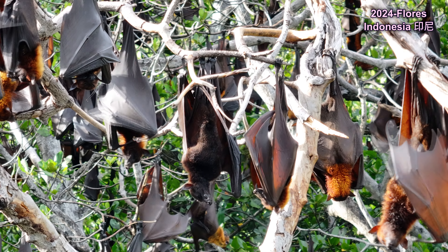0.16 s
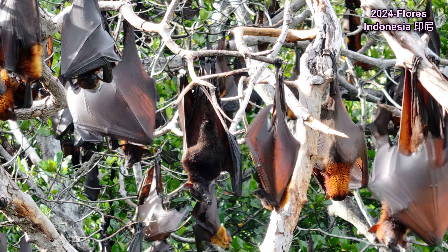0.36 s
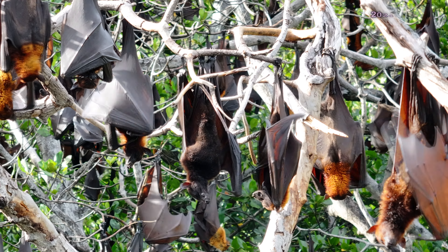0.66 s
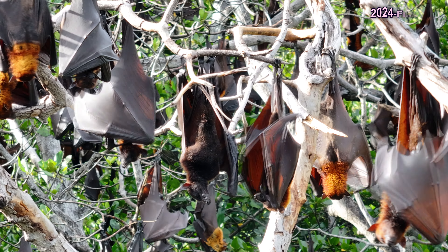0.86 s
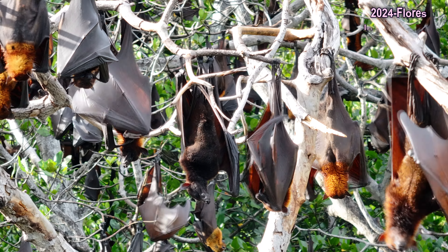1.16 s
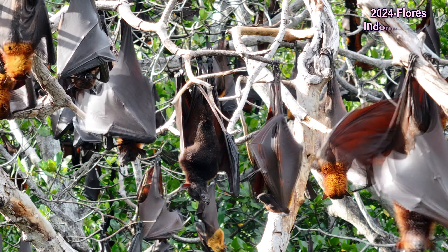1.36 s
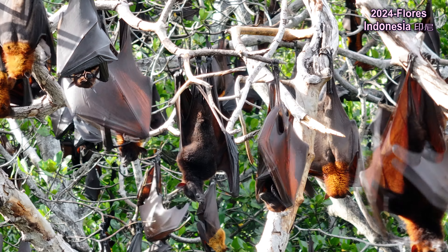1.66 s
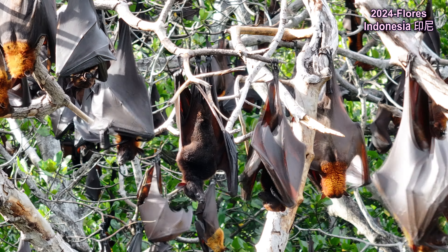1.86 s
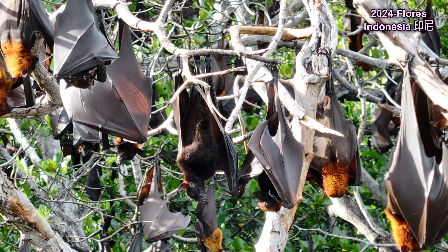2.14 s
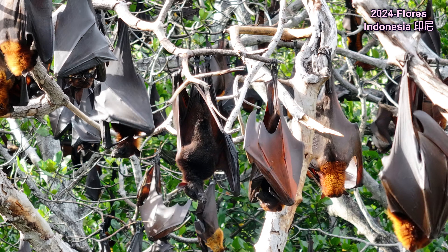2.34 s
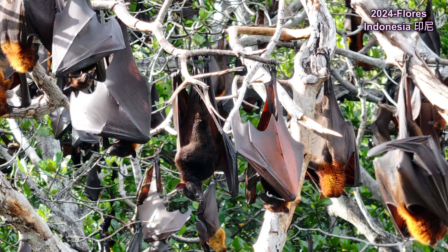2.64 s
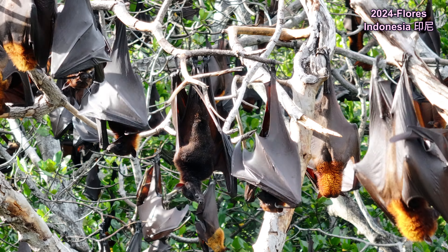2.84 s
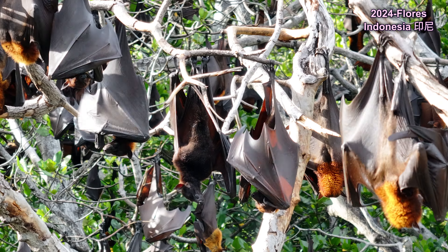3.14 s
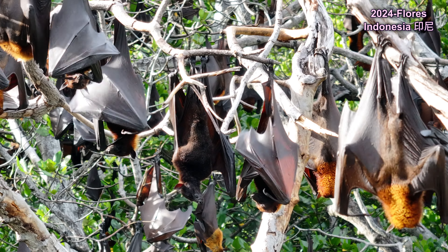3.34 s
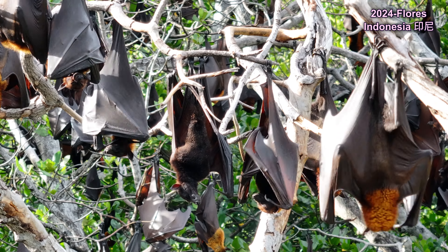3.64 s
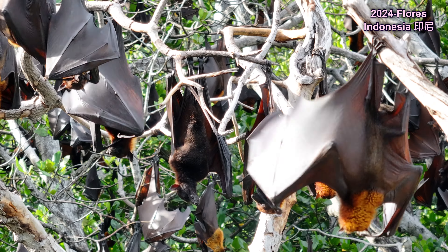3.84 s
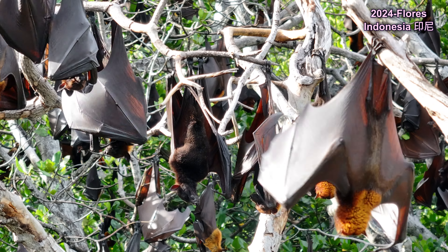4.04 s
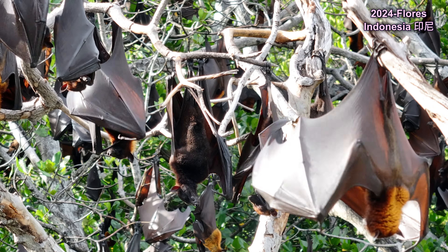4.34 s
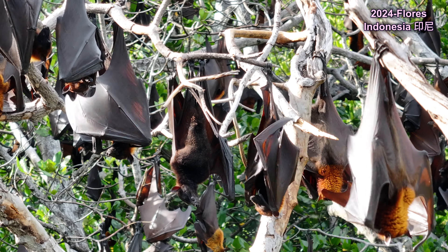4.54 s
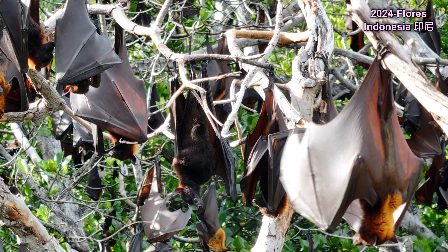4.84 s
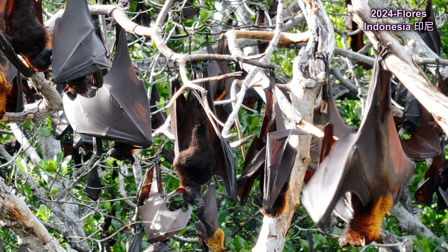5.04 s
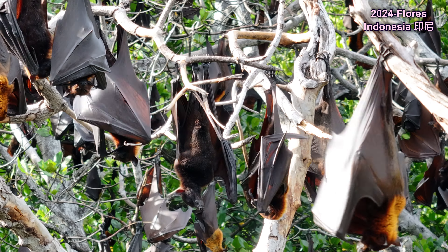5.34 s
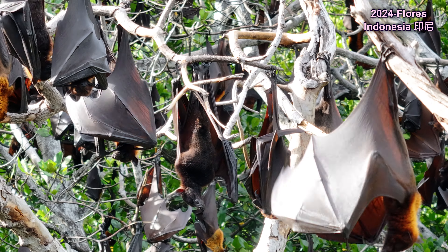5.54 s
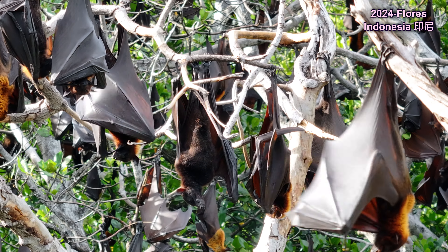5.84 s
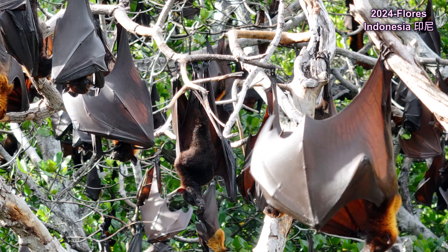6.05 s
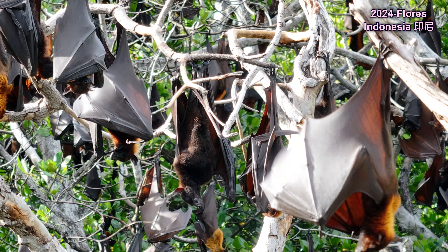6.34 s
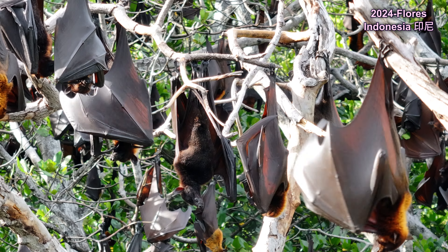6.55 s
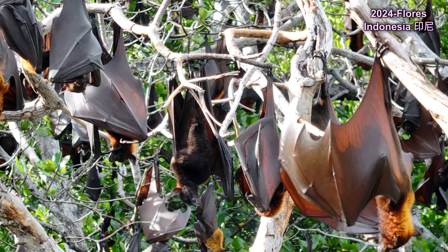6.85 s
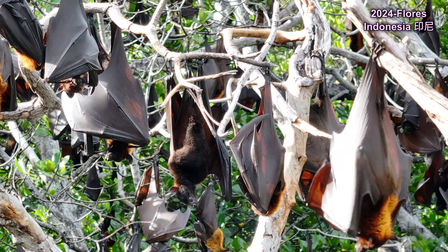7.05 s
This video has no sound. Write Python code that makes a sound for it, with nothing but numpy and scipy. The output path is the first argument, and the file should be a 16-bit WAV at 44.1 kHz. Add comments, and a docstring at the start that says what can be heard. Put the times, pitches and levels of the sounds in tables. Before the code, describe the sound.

A noisy fruit bat colony heard through one outdoor microphone, the same in both channels. Shrill massed squealing swells and ebbs under overlapping raspy screeches, brief squeaks and faint grunts. Early soft, heavy wing flaps and rumbling air give way to scattered creaky rattles close by, which grow into a continuous throbbing chatter, snapping and yapping over the crowd. Leaves and trunks add a short scattered tail.

```python
"""A shrill chorus and the dull clap of a wing open this roost of large fruit bats in the trees.
The chorus is hundreds of far squeals from noisy vocal folds; nearer bats whistle and screech over it
through throat resonances, with faint grunts below; a bat close by gives short rattles before and during
a long chatter, all made of snaps that ring its throat. Wing beats and gusts are coloured noise.
One microphone hears it all, and a limiter holds the peaks down."""
import sys
import numpy as np
from scipy import signal
from scipy.fft import rfft, irfft, next_fast_len
from scipy.io import wavfile
from scipy.ndimage import uniform_filter1d, minimum_filter1d

SR = 44100
rng = np.random.default_rng(int(sys.argv[2]) if len(sys.argv) > 2 else 0)


def to_wav(s):
    """Save 16-bit WAV."""
    ch = np.atleast_2d(s).T  # columns
    pcm = np.round(np.clip(ch, -1, 1) * 32767)  # PCM
    wavfile.write(sys.argv[1], SR, pcm.astype(np.int16))


N = 317520
TIME = np.arange(N) / SR


def amp(db):
    """Decibels to gain."""
    return 10 ** (np.asarray(db) / 20)


def unit(x):
    """Scales to rms 1."""
    return x / np.sqrt(np.mean(x ** 2) + 1e-20)


def samples(start, end):
    """Length of a call in samples, at least 10 ms."""
    return max(int((end - start) * SR), SR // 100)


def add(mix, s, sound):
    """Mixes a sound in at a time in seconds."""
    part = mix[max(round(s * SR), 0):][:len(sound)]
    part += sound[:len(part)]


def shape(x, gain):
    """Filters by a gain given as a function of frequency in Hz; rms 1."""
    size = next_fast_len(len(x))
    spectrum = rfft(x, size) * gain(np.fft.rfftfreq(size, 1 / SR))
    return unit(irfft(spectrum, size)[:len(x)])


def colour(x, points):
    """Filters by a curve of (Hz, dB) points, joined along log frequency; rms 1."""
    hz, db = np.transpose(points)
    return shape(x, lambda f: amp(np.interp(np.log(f + 1), np.log(hz), db)))


def waver(size, hz):
    """Random motion up to a rate: noise with its faster part filtered away."""
    noise = rng.standard_normal(size + 2048)
    return shape(noise, lambda f: 1 / (1 + (f / hz) ** 4))[:size]


def resonate(x, hz, width):
    """A steep resonance of gain 1 that can follow a curve: shift down to 0 Hz, smooth, shift back."""
    turn = np.exp(2j * np.pi * np.cumsum(hz * np.ones(len(x))) / SR)
    r = np.exp(-np.pi * abs(width) / SR)
    smooth = signal.lfilter([(1 - r) ** 2], [1, -2 * r, r * r], x / turn + 1e-18)
    return 2 * (turn * smooth).real


def folds(size, hz, arch, rough, jitter=0.0683, jitter_hz=450, wobble=0.01161, rasp_db=2.5, rasp_hz=130):
    """Strained vocal folds: an arching pitch whose cycles grow uneven and noisy with roughness."""
    rough = np.clip(rough, 0, 1)
    bend = arch * (np.sin(np.linspace(0, np.pi, size)) - 2 / np.pi) + wobble * waver(size, hz=33.4)
    uneven = jitter * rough * waver(size, jitter_hz)
    phase = 2 * np.pi * np.cumsum(hz * (1 + bend + uneven)) / SR
    # equal harmonics up to about half the sample rate make one sharp pulse a cycle
    top = int(SR / 2 / (hz * (1 + abs(arch))))
    pulses = unit(np.sin((top + .5) * phase) / (np.sin(phase / 2) + 1e-12) - 1)
    puffs = unit((1 + np.cos(phase)) * rng.standard_normal(size))
    voice = np.sqrt(1 - rough ** 2) * pulses + rough * puffs
    return voice * amp(rasp_db * waver(size, rasp_hz))


def canopy(x, t60, wet_db):
    """Trunks and leaves scatter the sound into a short tail of sparse echoes."""
    t = np.arange(SR // 2) / SR
    sparse = rng.random(len(t)) < 2500 / SR  # about 2500 echoes a second
    taps = rng.standard_normal(len(t)) * sparse * (t > .004) * amp(-60 * t / t60)
    tail = signal.fftconvolve(x, taps / np.linalg.norm(taps))[:N]
    return (x + amp(wet_db) * tail) / np.sqrt(1 + amp(wet_db) ** 2)


# The low outdoor background, as a filter curve. Each row: frequency in Hz, relative gain in dB.
BACKGROUND_COLOUR = [(25, -12), (60, -5.5), (130, -4.5), (250, 1), (340, -3), (550, 0.5), (800, -3.5),
                     (1250, -3.5), (2000, -7.5), (5000, -38)]


def background():
    """The low outdoor sound around the trees: coloured noise that drifts slowly in level."""
    noise = amp(-37) * colour(rng.standard_normal(N), BACKGROUND_COLOUR)
    return noise * amp(.9 * waver(N, hz=2.5))


# The far colony swells and ebbs at the microphone. Each row: time in seconds, relative level in dB.
CHORUS_SWELL = [(0, -20.5), (.24, -20.5), (.4, -19), (1.0, -18.5), (1.5, -16), (2.1, -16), (2.6, -18),
                (2.84, -16.5), (2.96, -19), (3.05, -17), (3.6, -16), (4.15, -17), (4.45, -22.5), (4.9, -16),
                (5.4, -18.5), (5.75, -22), (6.7, -21.5), (7.2, -19.5)]
# Its tone from afar, as a filter curve. Each row: frequency in Hz, relative gain in dB.
CHORUS_COLOUR = [(700, -27), (1200, -9.5), (1550, -6.5), (1900, 1), (2600, 2.5), (3300, 1), (4100, -2),
                 (5100, -1.5), (6100, -9), (8000, -10), (9400, -18), (10500, -23), (13000, -26),
                 (15700, -34)]


def colony(count=640, level_db=-1, spread_db=4.5, least_rough=0.303):
    """Far bats squeal in turn, each with its own pitch, length and level; their sum swells and ebbs."""
    out = np.zeros(N + SR)
    # the squeals start half a second early, so the chorus is already full at the opening
    for turn, (when, length, pitch, arch, rough, near) in enumerate(rng.random((count, 6))):
        size = int(SR * (.035 + .13 * length))
        call = folds(size, 900 * 3 ** pitch, .3 * (arch - .3), least_rough + .5 * rough)
        call = call * np.hanning(size)
        add(out, (turn + when) / count * (N / SR + .5), call * amp(2 * spread_db * near))
    scattered = canopy(out[SR // 2:][:N], t60=.45, wet_db=-4)
    crowd = colour(scattered, CHORUS_COLOUR)
    # even out the chance swells before the swell of the table
    crowd = crowd / np.sqrt(uniform_filter1d(crowd ** 2, size=SR // 6))
    return amp(level_db + np.interp(TIME, *np.transpose(CHORUS_SWELL))) * crowd


# Thin whistles and squeaks over the chorus. Each row: start in seconds, end in seconds, level in dB,
# pitch at the start in Hz, pitch at the end in Hz, arch of the pitch as a share.
WHISTLES = [(0.0, 0.132, -33.5, 9100, 9100, .045), (0.311, 0.386, -24, 1920, 2200, -0.051),
            (.32, 0.436, -35, 9450, 9500, -0.034), (.43, .553, -29.5, 9550, 8600, -0.017),
            (1.385, 1.45, -18.5, 3390, 3480, 0.12), (1.792, 1.895, -32, 5060, 5140, 0),
            (1.899, 1.997, -24, 2980, 2880, 0), (2.223, 2.331, -25, 2750, 2390, 0),
            (6.612, 6.644, -22, 4700, 4420, -0.014), (6.66, 6.69, -25, 4600, 4450, -0.0054),
            (6.974, 7.011, -22, 4340, 4370, 0.0097), (7.058, 7.232, -22.5, 4126, 4290, 0.001)]


def whistles(wobble=0.0122, octave_db=-13):
    """Nearly pure gliding squeaks: a wavering sine and its weaker octave."""
    out = np.zeros(N)
    for start, end, db, from_hz, to_hz, arch in WHISTLES:
        size = samples(start, end)
        bend = arch * np.sin(np.linspace(0, np.pi, size)) + wobble * waver(size, hz=120)
        phase = 2 * np.pi * np.cumsum(np.linspace(from_hz, to_hz, size) * (1 + bend)) / SR
        tone = unit(np.sin(phase) + amp(octave_db) * np.sin(2 * phase))
        add(out, start, amp(db) * tone * signal.windows.tukey(size, .5))
    return canopy(out, t60=0.3, wet_db=-34)


# Wing beats. Each row: start in seconds, level in dB, time to fall by 60 dB in seconds.
BEATS = [(0.0, -13.5, 0.17), (.382, -10, 0.17), (.773, -10, 0.18), (2.809, -19, 0.065), (4.015, -28, 0.082)]
# The dull tone of a beat, as a filter curve. Each row: frequency in Hz, relative gain in dB.
BEAT_COLOUR = [(30, -16), (90, -4), (200, 4.5), (450, 0), (700, -4.5), (1100, -6.5), (1800, -26),
               (5000, -53)]


def wing_beats():
    """Each beat is a dull clap of membrane: coloured noise with a fast rise and a steady decay."""
    out, t = np.zeros(N), np.arange(SR // 4) / SR
    for s, db, t60 in BEATS:
        clap = colour(rng.standard_normal(len(t)), BEAT_COLOUR)
        add(out, s, amp(db - 60 * t / t60) * clap * (1 - np.exp(-t / 0.00098)))
    return out


# Nearer screeches. Each row: start in seconds, end in seconds, relative level in dB, pitch in Hz,
# roughness (0 to 1; beyond 1 only the resonances widen), lower resonance in Hz, upper resonance in Hz,
# level of the upper against the lower in dB, level of the shrill top in dB.
SCREECHES = [ (0.058, 0.15, -23, 1000, 0.47, 2000, 6050, 11, -6),
             (.118, 0.184, -12, 1260, 0.61, 3000, 3480, -1, -40),
             (0.177, 0.302, -20.5, 1194, 0.7, 2760, 3630, 20, -30),
             (.285, 0.396, -16.5, 1085, 0.91, 2330, 6170, -4, -20),
             (0.413, 0.824, -15, 1309, 0.81, 2800, 5080, -4.5, -29),
             (0.482, .79, -17, 1430, 0.99, 4410, 7200, -6.5, -30),
             (0.704, 0.852, -19, 1226, .4, 2480, 4800, 11, -30),
             (.885, 1.138, -18.5, 1154, 1.17, 2040, 6250, -3, -28),
             (0.897, .95, -16.5, 1167, 0.68, 2070, 4760, -4, -11),
             (1.274, 1.48, -18.5, 1155, 0.5, 2230, 4600, -25, -40),
             (1.433, 1.83, -16, 1216, 0.9, 1950, 3320, 0.5, -25),
             (1.606, 1.765, -18.5, 1156, .3, 2240, 3750, -5, -35),
             (1.91, 2.05, -17, 1484, 0.84, 1900, 3230, 8, -14),
             (1.918, 2.34, -33, 1334, 0.5, 9500, 12600, 0, -20),
             (1.974, 2.218, -16.5, 1625, .8, 3370, 5200, -10, -24),
             (2.164, 2.355, -18, 1362, 0.65, 2720, 5630, -4, -13),
             (2.424, 2.80, -21.5, 1266, 0.54, 1920, 2870, -4, -33),
             (3.142, 3.22, -19, 1100, 0.67, 2240, 5630, -4, -32),
             (3.749, 4.13, -19.5, 1665, 0.72, 3470, 4970, -5, -10.5),
             (3.983, 4.33, -19, 1740, 0.79, 5040, 6900, 5, -7),
             (4.268, 4.66, -22, 1358, 0.66, 5300, 7100, 0.5, -7),
             (4.325, 4.51, -25, 1525, 0.77, 9000, 12200, 5, -10),
             (4.931, 5.213, -15.5, 1473, 0.64, 5670, 7340, 9, -11),
             (5.162, 5.301, -17, 948, .65, 2930, 9000, -8, -8),
             (5.276, 5.643, -25, 1100, 0.86, 2960, 8600, -5, -12),
             (6.771, 6.98, -20, 1413, 0.8, 2590, 5550, 0.5, -24),
             (6.954, 7.254, -19, 1348, 0.72, 2670, 5540, 5, -12)]
# Top resonances that all screeches share. Each row: frequency in Hz, width in Hz, relative level in dB.
SHRILL_TOP = [(9140, 1630, 10), (11900, 5700, -2)]
# a resonance widens with roughness and frequency: at roughness 1 it is WIDTH_HZ wide at WIDTH_AT_HZ
WIDTH_HZ, WIDTH_AT_HZ, WIDTH_POWER = 1630, 2900, 0.96
# in every screech the pitch and the opening mouth arch up and down by these shares
ARCH, MOUTH_ARCH = .045, 0.11


def branches(x, count=6, echo_db=-11, longest_s=.004):
    """A few echoes from the nearest branches comb a voice with uneven fixed stripes."""
    delays = rng.random(count) * longest_s + 0.000884
    signs = rng.choice([-1, 1], count)
    return shape(x, lambda f: abs(1 + amp(echo_db) * np.exp(-2j * np.pi * np.outer(f, delays)) @ signs))


def screeches(level_db=-1, rise=0.13, fall=0.37, skirt_db=-15, flutter_db=2, flutter_hz=60):
    """Nearer bats force a rough, fluttering voice through two throat resonances and a shrill top."""
    out = np.zeros(N)
    for start, end, db, hz, rough, low_hz, high_hz, high_db, shrill_db in SCREECHES:
        size = samples(start, end)
        drive = branches(folds(size, hz, ARCH, rough))
        u = np.linspace(0, 1, size)
        mouth = 1 + MOUTH_ARCH * (np.sin(np.pi * u) - 2 / np.pi)

        def throat(f):
            """One throat resonance that moves with the mouth."""
            width = rough * WIDTH_HZ * (f / WIDTH_AT_HZ) ** WIDTH_POWER
            return unit(resonate(drive, f * mouth, width))

        throats = unit(throat(low_hz) + amp(high_db) * throat(high_hz))
        shrill = unit(sum(amp(top_db) * resonate(drive, f, width) for f, width, top_db in SHRILL_TOP))
        skirt = amp(skirt_db) * colour(drive, CHORUS_COLOUR)  # broad sound around the resonances
        voice = unit(throats + amp(shrill_db) * shrill) + skirt
        voice = shape(voice, lambda f: 1 / (1 + (1450 / (f + 1)) ** 6))  # a small mouth radiates little bass
        # swells in, holds, dies away
        effort = np.sin(np.pi / 2 * np.clip(np.minimum(u / rise, (1 - u) / fall), 0, 1))
        flutter = flutter_db * waver(size, flutter_hz)
        add(out, start, amp(db + level_db + flutter) * voice * effort)
    return canopy(out, t60=0.96, wet_db=-2.5)


# Weak lower partials and low grunts of the quarrel. Each row: start in seconds, end in seconds,
# level in dB, pitch in Hz, roughness from 0 to 1.
GRUNTS = [(0.32, 0.377, -25, 985, 0.3), (0.422, 0.757, -35, 1340, 0.24), (1.818, 2.008, -29.5, 445.4, 0.77),
          (2.224, 2.746, -39.5, 1350, 0.13), (2.622, 2.802, -34, 900, 0.5),
          (4.646, 5.285, -33, 279.8, 0.74), (5.297, 6.394, -49, 273.5, 0.76)]


def grunts(level_db=0, far_db=-43, count=70):
    """Faint low calls of the folds, a few near and many far, under the shrill voices."""
    out, far = np.zeros(N), np.zeros(N)
    for start, end, db, hz, rough in GRUNTS:
        size = samples(start, end)
        call = colour(folds(size, hz, arch=0.0668, rough=rough), BACKGROUND_COLOUR)
        add(out, start, amp(db + level_db) * call * signal.windows.tukey(size, .5))
    for when, length, pitch, arch in rng.random((count, 4)):
        size = int(SR * (.1 + .25 * length))
        call = folds(size, 220 * 3 ** pitch, .2 * (arch - .5), rough=.2)
        add(far, when * N / SR, call * np.hanning(size))
    return canopy(out + amp(far_db) * colour(far, BACKGROUND_COLOUR), t60=0.3, wet_db=-1.0)


# Gusts of air on the microphone. Each row: time of the peak in seconds, length in seconds, level in dB.
BUFFETS = [(0.55, 0.24, -30), (0.918, 0.086, -22), (1.044, 0.27, -17.5), (1.34, 0.25, -35),
           (2.519, 0.28, -23.5)]
# Their rumble, as a filter curve. Each row: frequency in Hz, relative gain in dB.
BUFFET_COLOUR = [(15, -18), (30, -4), (52, 0), (100, -2), (170, -8), (300, -15.5), (600, -26), (2000, -54)]


def buffets():
    """Air buffets the microphone: each gust swells and dies as a rumble of low noise."""
    gusts = np.zeros(N)
    for s, length, db in BUFFETS:
        gusts += amp(db) * np.cos(np.pi * np.clip((TIME - s) / length, -.5, .5)) ** 2
    return gusts * colour(rng.standard_normal(N), BUFFET_COLOUR)


# Throat of the bat close by. Each row: multiple of the mouth resonance, width in Hz, relative level in dB.
THROAT = [(1, 420, 8.5), (2.48, 786, -1.5), (3.6, 1520, -8), (4.8, 1800, -54)]


def creak(mouth_hz, per_s, snap_db, uneven_db, puff_s=0.0054, drift=0.033, ring_db=0):
    """Uneven snaps of the folds, at a given rate, each with a puff of air, ring the throat."""
    size = len(mouth_hz)
    turns = np.cumsum(per_s * np.exp(.3 * waver(size, hz=71.45))) / SR + .9
    strength = amp(uneven_db * rng.standard_normal(N // 100))[turns.astype(int)]
    age = (turns % 1) / per_s  # about the seconds since the last snap
    gate = strength * np.exp(-age / puff_s)
    air = unit(gate * rng.standard_normal(size))
    mouth_hz = mouth_hz * (1 + drift * waver(size, hz=59.85))
    ring = gate * np.cos(2 * np.pi * np.cumsum(mouth_hz) / SR)
    voice = unit(sum(amp(db) * resonate(air, k * mouth_hz, width) for k, width, db in THROAT))
    voice = unit(voice + amp(ring_db) * unit(resonate(ring, mouth_hz, width=950)))
    # the edge of each snap is a short bright tick
    edge = strength * np.exp(-age / .0012) * rng.standard_normal(size)
    tick_colour = [(1500, -41), (4800, -5.5), (6000, 0.5), (9500, -4.0), (12000, -10.0), (16000, -20.0)]
    return voice + amp(snap_db - 2.0) * colour(edge, tick_colour)


# Short rattling calls close by. Each row: start in seconds, end in seconds, relative level in dB,
# mouth resonance in Hz, relative level of the snaps in dB.
RATTLES = [(1.793, 1.832, -18.5, 2020, -4), (1.924, 1.972, -22.5, 1900, -2), (2.029, 2.047, -16, 1880, -16),
           (2.12, 2.163, -20.5, 1900, -18), (2.808, 2.84, -17, 1980, -9), (2.857, 2.915, -22, 2200, -25),
           (3.047, 3.10, -14.5, 2040, -8), (3.402, 3.508, -15, 2240, -12), (3.57, 3.603, -14, 2217, -22),
           (3.619, 3.675, -11.5, 2280, -14), (4.276, 4.372, -13.5, 2290, -22),
           (4.501, 4.576, -13, 2270, -10), (4.829, 4.885, -14.5, 2256, -8.5),
           (5.537, 5.62, -15.5, 2070, -6), (6.245, 6.385, -17.5, 1942, -6), (6.481, 6.698, -18, 2150, -4.5)]


def rattles(level_db=-1, snaps_per_s=95):
    """Short calls of the bat close by: a creak of about 95 snaps a second, heard as a rattle."""
    out = np.zeros(N)
    for start, end, db, hz, snap_db in RATTLES:
        size = samples(start, end)
        mouth_hz = np.full(size, hz)
        call = creak(mouth_hz, snaps_per_s, snap_db, uneven_db=1.5, puff_s=0.0045, drift=0.0288, ring_db=3.5)
        add(out, start, amp(db + level_db) * unit(call * signal.windows.tukey(size, .4)))
    return out


# Effort and mouth of the long chatter. Each row: time in seconds, relative level in dB,
# mouth resonance in Hz.
CHATTER = [(4.6, -19, 2060), (4.78, -14, 1920), (4.96, -24.5, 2020), (5.119, -13, 1951),
           (5.35, -16.5, 1957), (5.501, -13, 2000), (5.78, -14.5, 1970), (6.35, -14.5, 1980),
           (6.47, -15, 2042), (6.57, -13.5, 2000), (6.721, -15.5, 2103), (6.799, -13.5, 1994),
           (7.2, -12.5, 2085)]


def chatter(level_db=-2.6, throb_hz=26.4, throb_db=1.5):
    """One long quarrelling creak that throbs at an uneven syllable rate."""
    out = np.zeros(N)
    s, db, hz = np.transpose(CHATTER)
    t = np.arange(s[0], s[-1], 1 / SR)
    call = creak(np.interp(t, s, hz), per_s=150, snap_db=-11.5, uneven_db=1.9, drift=0.04513)
    throb = throb_db * waver(len(t), throb_hz)
    add(out, s[0], amp(np.interp(t, s, db) + level_db + throb) * call)
    return out


# The hardest yaps within the chatter. Each row: time in seconds (the yap begins 2 ms before),
# relative level in dB, mouth resonance in Hz.
YAPS = [(4.9501, -6.5, 2005), (5.2724, -10, 2020), (5.3338, -12, 1930), (5.4555, -4, 1970),
        (5.5498, -6, 1974), (5.688, -11, 2010), (5.8721, 2, 2015), (5.9429, -1, 2030), (6.0352, -6, 2150),
        (6.116, -6, 1856), (6.1441, -6, 2015), (6.1873, -13, 2020), (6.3749, -4, 2010), (6.5839, -10, 1915),
        (6.9845, -1, 2240), (7.1285, -10, 2135)]


def yaps(level_db=-7.5, length_s=.015):
    """Hard bursts of very fast creaking, each swelling and dying within a few milliseconds."""
    out = np.zeros(N)
    for s, db, hz in YAPS:
        size = int(length_s * SR)
        call = creak(np.full(size, hz), per_s=360, snap_db=-24, uneven_db=1.5)
        add(out, s - .002, amp(db + level_db) * unit(call * np.hanning(size)))
    return out


def near_bat():
    """The bat close by: short rattles before and during a long chatter with yaps, in a short canopy tail."""
    return canopy(rattles() + chatter() + yaps(), t60=0.14, wet_db=-3.5)


def scene():
    """All the bats over a low outdoor background, alike in both channels."""
    far = background() + colony()
    nearer = whistles() + screeches() + grunts()
    close = wing_beats() + buffets() + near_bat()
    mono = far + nearer + close
    return np.array([mono, mono])


# the level dips briefly once: time in seconds, half-width in seconds, depth in dB
DIP_AT_S, DIP_S, DIP_DB = .844, 0.012, -18
EDGE_HZ = 15750  # upper band limit


def record(dry, gain_db=1.33, ceiling_db=-2.4, recovery_db=400):
    """The level dips briefly once; a fast limiter holds the peaks; then the band limit."""
    dip_db = DIP_DB * np.exp(-((TIME - DIP_AT_S) / DIP_S) ** 2)
    x = dry * amp(gain_db + dip_db)
    peak_db = 20 * np.log10(-minimum_filter1d(-abs(x[0]), size=64) + 1e-9)
    # a held peak falls by recovery_db in each second
    fall = TIME * recovery_db
    held_db = np.maximum.accumulate(peak_db + fall) - fall
    over_db = np.maximum(held_db - ceiling_db, 0)
    x = x / amp(uniform_filter1d(over_db, size=64))
    low_pass = signal.firwin(611, EDGE_HZ, window=("kaiser", 9), fs=SR)
    return signal.oaconvolve(x, low_pass[None], "same")


dry = scene()
out = record(dry)
to_wav(out)
```